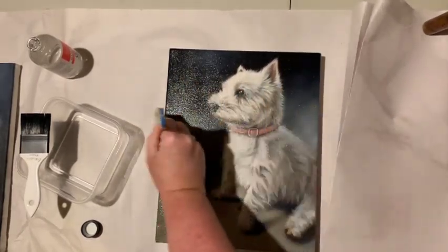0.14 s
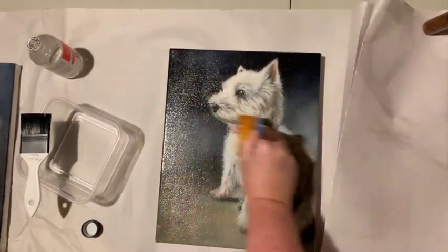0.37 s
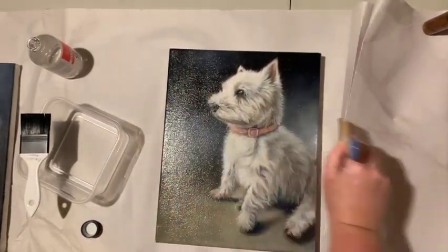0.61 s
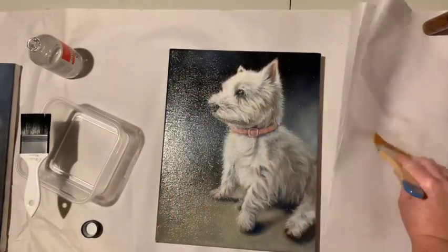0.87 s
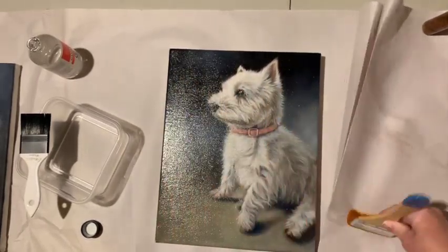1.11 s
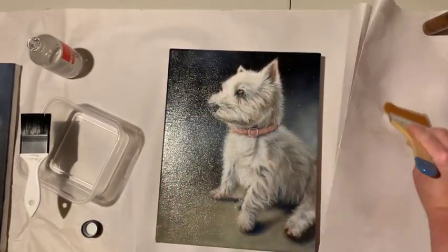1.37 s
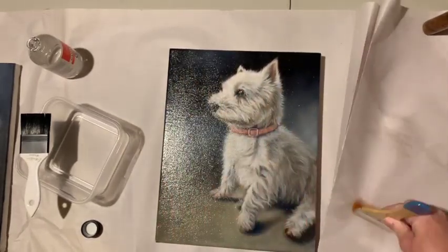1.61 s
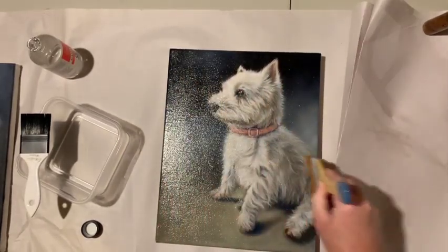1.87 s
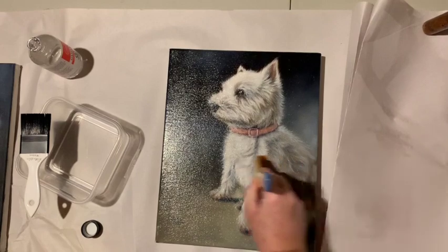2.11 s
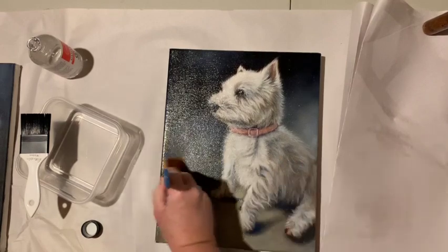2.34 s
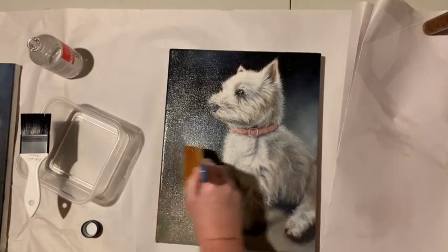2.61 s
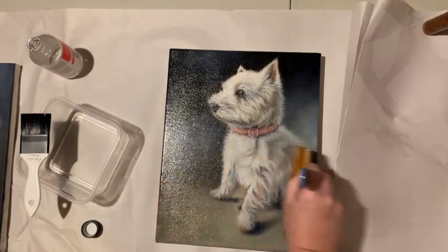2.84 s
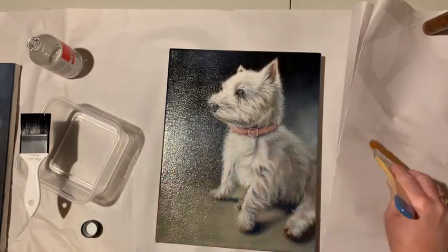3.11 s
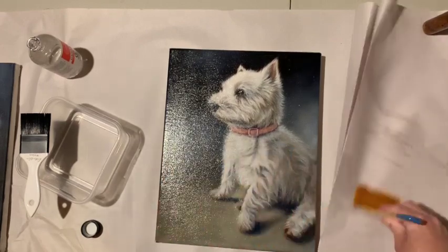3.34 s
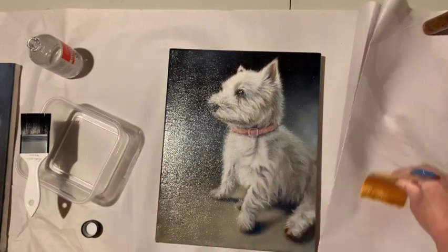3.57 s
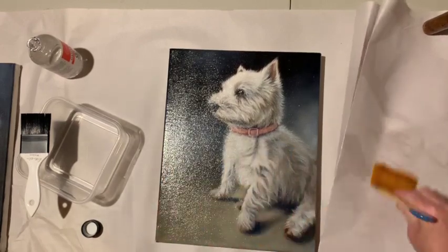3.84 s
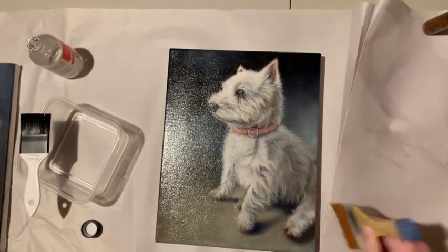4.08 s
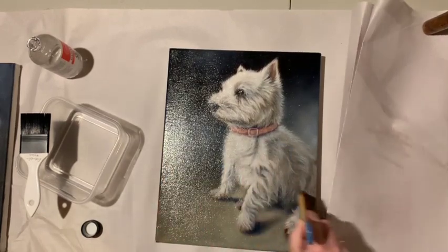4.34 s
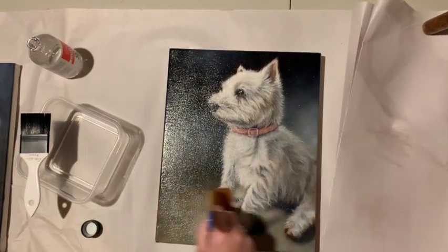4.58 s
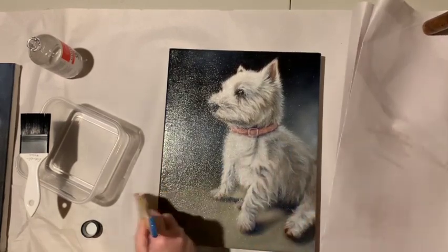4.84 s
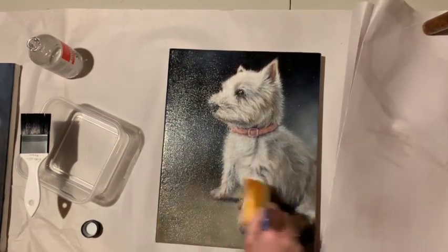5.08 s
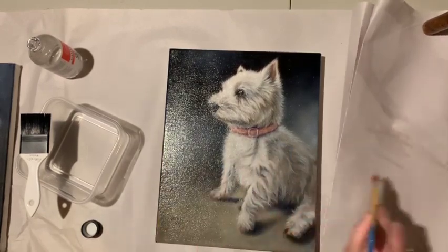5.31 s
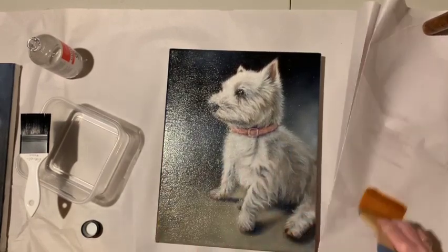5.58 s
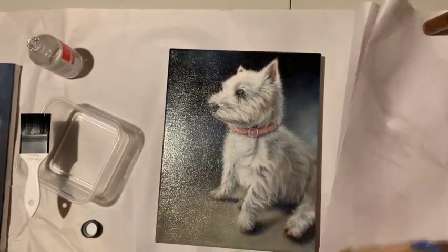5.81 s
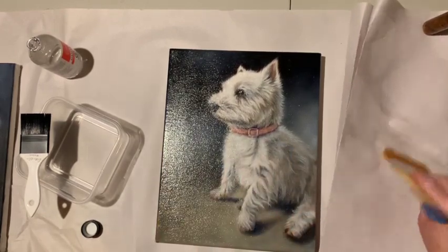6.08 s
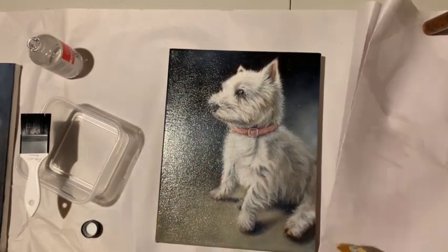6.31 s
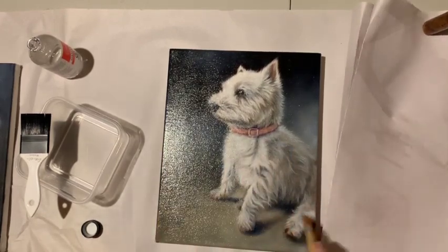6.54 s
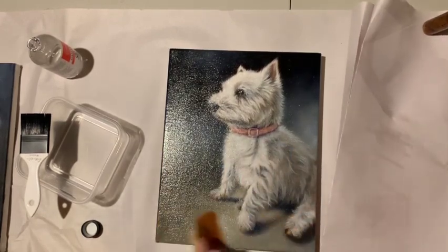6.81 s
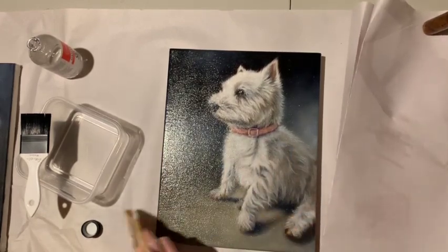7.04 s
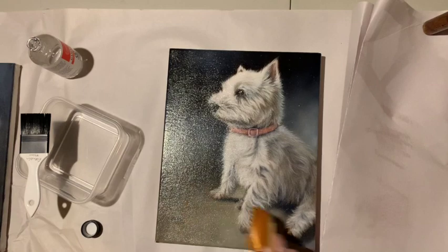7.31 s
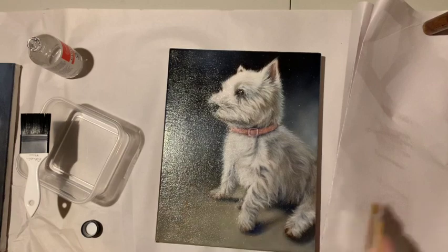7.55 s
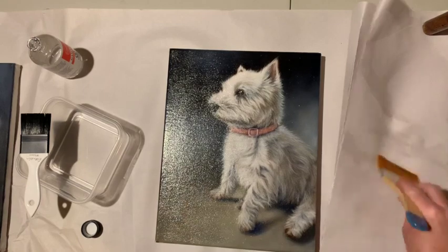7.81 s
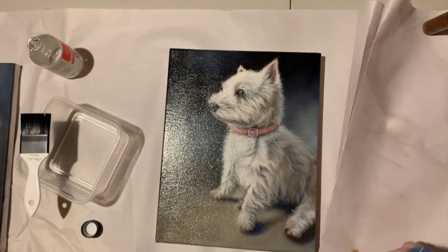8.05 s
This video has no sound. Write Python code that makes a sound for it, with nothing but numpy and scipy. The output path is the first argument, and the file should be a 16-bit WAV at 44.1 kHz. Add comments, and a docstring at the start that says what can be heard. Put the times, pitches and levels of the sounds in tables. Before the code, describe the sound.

Close up in a small quiet room, a flat bristle brush makes airy back-and-forth swishes over a varnished board. Between them it slaps onto loose paper, with a crisp tick and dull low boom, then scrapes to and fro with crackle and snaps. The pattern repeats about every two seconds; later board strokes grow louder. Faint rumble and a thin hum lie beneath.

```python
"""A flat brush is swept over a varnished board, then flopped onto loose paper and wiped to and fro.
Its bristles hiss and scratch: streams of random clicks, coloured and made louder and softer by each stroke.
The board answers through broad resonances; the paper crackles, rasps and snaps, and booms as low ringing tones.
A quiet room adds a short wash, dull rumble, faint hiss and a thin wavering hum."""
import sys
import numpy as np
from scipy import signal
from scipy.fft import rfft, irfft
from scipy.io import wavfile
from scipy.ndimage import uniform_filter1d

SR = 44100
rng = np.random.default_rng(int(sys.argv[2]) if len(sys.argv) > 2 else 0)


def file_out(sig):
    """Save sig as 16-bit WAV at sys.argv[1]."""
    # one column per channel
    cols = np.atleast_2d(sig).T
    # limit, then scale
    lim = np.clip(cols, -1, 1)
    pcm = np.round(lim * 32767).astype(np.int16)
    wavfile.write(sys.argv[1], SR, pcm)


def rack_gain(trim_db):
    """Turn a fader trim in dB into the linear factor to multiply a signal by."""
    fader = np.asarray(trim_db, float)
    return 10 ** (fader / 20)


N = 360297   # length in samples

# The quiet room's rumble. Each row: frequency in Hz, level in dB per Hz.
ROOM_COLOUR = [(25, -16), (104, 0), (155, -3), (250, -5.5), (355, -0.5), (421, -11), (543, -15.5),
               (631, -12), (800, -21.5), (1500, -22.5), (3000, -36.5), (4000, -29.5)]
ROOM_DB, ROOM_HISS_DB = -59.5, -95

# Thin steady tones. Each row: frequency in Hz, usual left level in dB rms, right over left in dB.
HUM_TONES = [(619.4, -65.5, -17)]

# Sweeps across the board. Each row: touch, fastest moment and lift in seconds, hiss in dB while creeping,
# hiss in dB at full speed, board in dB at full speed.
SWEEPS_ON_BOARD = [(0.146, 0.378, .55, -78.5, -55.5, -54), (1.964, 2.266, 2.415, -70, -61, -56.5),
                   (2.51, 2.714, 2.83, -73, -54.5, -54), (4.29, 4.594, 4.75, -69.5, -52.5, -54),
                   (4.89, 5.07, 5.20, -64.5, -50.5, -53.5), (6.538, 6.845, 6.99, -59.5, -42, -49),
                   (7.111, 7.30, 7.4, -56, -48.5, -56.5)]
SPEED_UP_DB_PER_S, SLOW_DOWN_DB_PER_S, ROUNDING_S = 161, 106, 0.047
BOARD_FOLLOWS, BOARD_LEADS_S = 0.82, 0.017   # the board takes this share of the swing, a little early
SCRATCH_AT_HISS_55_DB, SCRATCH_FOLLOWS = -57, 0.68   # scratch when the hiss is at -55 dB, share of its swing

# Wipes on the loose paper. Each row: touch and lift in seconds, levels of hiss, scratch and paper in dB.
WIPES_ON_PAPER = [(0.858, 1.35, -50.5, -53, -50), (1.424, 1.635, -50.5, -56.5, -53),
                  (3.155, 3.68, -53.5, -64, -66), (3.76, 3.967, -50.5, -56.5, -54),
                  (5.473, 6.045, -50, -50.5, -50), (6.097, 6.31, -50.5, -54, -53),
                  (7.799, 8.2, -51.5, -55, -53)]
PAPER_SETTLES_S = 0.15   # the paper still counts as the surface this long after a lift

# How contact begins and ends, in the order hiss, scratch, surface.
TOUCH_DB_PER_S, LIFT_DB_PER_S = (2000, 1500, 1200), (465, 295, 222)
# A faint creep lingers after a lift; paper keeps moving more than the board.
BOARD_SETTLE_DB, PAPER_SETTLE_DB, SETTLE_DB_PER_S = (-27, -23, -7), (-30, -17, -7), (28, 60, 67)

# Bristles splay as the brush comes down hard.
# Each row: time in seconds, fade in dB per second, levels of hiss, scratch and surface in dB.
BRUSH_LANDINGS = [(.866, 228, -52, -40, -43), (1.64, 337, -71, -41, -41), (1.955, 105, -76, -54.5, -48.5),
                  (2.514, 50, -73, -61.5, -64), (3.163, 152, -42.5, -38.5, -58),
                  (4.297, 87, -69, -56, -57.5), (5.469, 153, -50, -57, -53),
                  (5.938, 194, -35.5, -42, -39.5), (6.53, 161, -71, -55, -54),
                  (6.698, 300, -45.5, -39.5, -46), (7.802, 202, -46.5, -47, -47.5)]
LANDING_DB_PER_S = 2501   # how fast a landing swells

# Short rustles and flicks that swell and fade.
# Each row: time in seconds, fade in dB per second, levels of hiss, scratch and surface in dB.
SHORT_RUSTLES = [(0.048, 400, -60.5, -60, -59), (1.083, 300, -49, -37.5, -42.5),
                 (1.185, 200, -43, -43, -43.5), (1.342, 202, -76, -55, -47.5),
                 (1.444, 203, -51, -46.5, -43), (1.841, 600, -90, -75, -55.5),
                 (3.387, 53, -46.5, -47.5, -46.5), (3.52, 152, -52, -57, -58), (3.682, 411, -55, -55, -45),
                 (4.78, 400, -52.5, -56, -62), (8.15, 200, -47, -45, -50.5), (5.698, 203, -46, -54, -52.5),
                 (6.034, 253, -56, -41, -50), (6.553, 260, -53, -57, -74), (7.313, 200, -60, -45, -46),
                 (7.444, 303, -67, -59, -62), (7.573, 300, -95, -78, -61), (3.65, 217, -48.5, -62, -68),
                 (6.106, 206, -46, -52, -49), (7.997, 153, -47, -46.5, -48.5)]
RUSTLE_SWELL = 2.64   # the swell is this many times faster than the fade

# The sheet is pressed flat just after a landing.
# Each row: time in seconds, fade in dB per second, levels of hiss, scratch and paper in dB.
SHEET_SLAPS = [(0.893, 247, -59, -47, -38.5), (3.18, 150, -43.5, -34, -35.5), (5.494, 134, -65, -54, -45),
               (7.824, 258, -61, -44, -41.5)]
SLAP_DB_PER_S = 1100   # how fast a slap swells
RASP_HZ, RASP_WIDTH_HZ, RASP_OVER_PAPER_DB = 1400, 1200, 1

# Colour of the bristle hiss. Each row: frequency in Hz, level in dB per Hz.
HISS_COLOUR = [(3000, -16), (4500, -3), (5500, 0), (7000, -1), (10000, -1), (12000, -3), (16000, -4)]
# Colour of the bristle scratch. Each row: frequency in Hz, level in dB per Hz.
SCRATCH_COLOUR = [(1500, -10), (2200, -1), (3000, 0), (4000, -1), (4800, -6), (6000, -22)]
# Colour of the paper's crackle. Each row: frequency in Hz, level in dB per Hz.
PAPER_COLOUR = [(50, -11.5), (110, -0.5), (220, -9), (330, -3), (480, -9.5), (800, -5.5), (1100, -6.5),
                (1600, -5.5), (2200, -8), (3200, -21.5)]
# Broad resonances of the board. Each row: frequency in Hz, width in Hz, level in dB before speed shifts it.
BOARD_MODES = [(676, 315, 2.5), (1030, 410, -4), (1292, 480, -5), (1830, 2000, -14)]

# Ticks of the brush against an edge and snaps of paper.
# Each row: time in seconds, peak of the high part in dB, peak of the low part over it in dB.
TICK_TIMES = [(.1411, -60, -6), (0.8687, -27, -5), (0.9292, -27, -6), (1, -35, -1.5), (1.081, -25.5, -5),
              (1.108, -39, 8.5), (1.1977, -39, 7), (1.2526, -36, 8), (1.317, -36, -12),
              (1.5223, -39.5, 7.5), (1.6357, -34, -11), (1.8203, -65.5, 22.5), (2.5107, -57.5, 13),
              (3.1621, -23.5, 0.5), (3.3922, -27.5, -6), (3.6768, -33.5, -6.5), (3.756, -36, -23),
              (3.8366, -40, 10.5), (3.951, -45, 7), (4.2918, -45, -3), (4.7766, -38, -9), (4.8925, -45, -5),
              (5.464, -34.5, -6), (5.756, -26.5, 3.5), (5.9022, -26.5, -10.5), (5.911, -27, 1),
              (5.934, -9, -14.5), (6.021, -28, 1), (6.1782, -44, 7), (6.2994, -39, 7), (6.5256, -43, -1),
              (6.702, -19, -28), (6.887, -31.5, 0), (7.1117, -53, -14), (7.306, -28.5, -14),
              (7.379, -39, 0), (7.5658, -66, 15), (8.078, -41, 5.5)]
# Resonances of a tick, the low part first. Each row: frequency in Hz, width in Hz, usual level in dB.
TICK_RESONANCES = [(1480, 1800, 0), (3630, 2700, 3), (5260, 1900, 2.5), (6610, 3700, -0.5),
                   (9600, 3600, -7.5)]

# The sheet is slapped onto the table. Each row: time in seconds, strength in dB.
BOOM_TIMES = [(0.891, -31.5), (1.473, -46.5), (3.191, -29.5), (3.78, -51), (3.928, -48), (5.501, -37.5),
              (5.962, -50), (6.706, -50.5), (7.829, -38.5)]
# Low modes of sheet and table.
# Each row: frequency in Hz, usual level in dB, time in seconds to fade by 60 dB.
SHEET_MODES = [(71, -14.5, .3), (103, -6.5, 0.35), (150.5, 0.5, 0.52), (171.5, -7, 0.35), (286, -17, 0.16)]
FREE_RING_S, DAMPED_DB = 0.081, -4.5   # after ringing freely, the sheet is damped by the dragging brush

TAIL_T60_S, TAIL_DB = 0.1, -10   # time for the walls' wash to fade by 60 dB, and its level

# Phase of the stereo widening. Each row: frequency in Hz, radians by which the right leads.
WIDENING_PHASE = [(0, 0), (700, .6), (1500, .1), (2500, -2.2), (3100, -1.35), (3700, -1.75), (4700, -3.14),
                  (15350, -18.85)]
# Wavering copy of the sound added on the right, blurring the stereo image.
# Each row: frequency in Hz, level in dB over the steady copy.
RIGHT_WAVER = [(60, -17), (150, -7.5), (500, 3.5), (1600, -2.5), (2500, 4), (4500, -12.5)]
# Balance of the two sides. Each row: frequency in Hz, right over left in dB.
RIGHT_BALANCE = [(100, 0), (400, -2), (1000, 0.5), (2300, 1.5), (3200, 0.5)]
CUTOFF_HZ = 15720


def rms_one(x):
    """Scale a sound so that its average strength (rms) is 1."""
    return x / np.sqrt(np.mean(x ** 2) + 1e-20)


def at_hz(points, hz):
    """Read a curve at any frequency, joining its points on a logarithmic frequency scale."""
    hz_points, values = np.transpose(points)
    return np.interp(np.log(hz + 1), np.log(hz_points), values)


def coloured(x, spectrum, edge_db=-40):
    """Shape by a spectrum that falls away beyond its ends; rms 1."""
    lowest_hz, highest_hz = spectrum[0][0], spectrum[-1][0]
    closed = [(lowest_hz / 2, edge_db), *spectrum, (highest_hz * 2, edge_db)]
    gain = rack_gain(at_hz(closed, np.fft.rfftfreq(N, 1 / SR)))
    return rms_one(irfft(rfft(x) * gain, N))


def drift(rate):
    """Slow random wandering of rms 1, made by smoothing noise; a higher rate in Hz wanders faster."""
    r = np.exp(-2 * np.pi * rate / SR)
    noise = rng.standard_normal(N + SR)
    smooth = signal.lfilter([1], [1, -2 * r, r * r], noise)
    return rms_one(smooth[SR:])   # leave out the first second, while the filter settles


def grains(per_s, spread_db):
    """Random clicks, up or down, with a long tail of sizes."""
    signs = rng.choice([-1, 1], N)
    sizes = rack_gain(spread_db * np.minimum(rng.exponential(1, N), 5))
    return sizes * signs * (rng.random(N) < per_s / SR)


def band(x, hz, width_hz):
    """One resonance, gain 1 on top."""
    r = np.exp(-np.pi * width_hz / SR)
    feedback = [1, -2 * r * np.cos(2 * np.pi * hz / SR), r * r]
    return signal.lfilter([(1 - r * r) / 2, 0, (r * r - 1) / 2], feedback, x + 1e-18)


def room():
    """Dull steady rumble and faint hiss: coloured noise plus plain noise."""
    rumble = coloured(rng.standard_normal(N), ROOM_COLOUR)
    return rack_gain(ROOM_DB) * rumble + rack_gain(ROOM_HISS_DB) * rng.standard_normal(N)


def hum():
    """A thin tone whose phase and level waver a little, stronger on the left."""
    now, out = np.arange(N) / SR, np.zeros((2, N))
    for hz, left_db, right_db in HUM_TONES:
        tone = np.sqrt(2) * np.sin(2 * np.pi * hz * now + 1.2 * drift(4))
        out += tone * rack_gain(1.5 * drift(3) + [[left_db], [left_db + right_db]])
    return out


def hump(now, s, rise, fall):
    """dB that climb to 0 at s and sink again."""
    return np.where(now < s, rise * (now - s), fall * (s - now))


def swing(now, fastest, depth_db):
    """dB below full speed: a rounded top, never under the creeping level."""
    away = np.hypot(now - fastest, ROUNDING_S) - ROUNDING_S
    slope = np.where(now < fastest, SPEED_UP_DB_PER_S, SLOW_DOWN_DB_PER_S)
    return np.maximum(depth_db, -away * slope)


def contact(now, touch, lift, settle_db):
    """dB gate for hiss, scratch and surface: quick touch, slower lift, then a faint settling."""
    early, late = np.maximum(touch - now, 0), np.maximum(now - lift, 0)
    gates = []
    for up, down, rest, creep in zip(TOUCH_DB_PER_S, LIFT_DB_PER_S, settle_db, SETTLE_DB_PER_S):
        ending = np.maximum(-down * late, rest - creep * late)
        gates.append(-up * early + ending)
    return np.array(gates)


def stroke_levels():
    """Levels of hiss, scratch and surface in dB: the powers of all gestures add up."""
    now, parts = np.arange(N // 32 + 2) * 32 / SR, []   # one point every 32 samples
    for touch, fastest, lift, creep_db, top_db, board_db in SWEEPS_ON_BOARD:
        held = np.minimum(now, lift)   # the speed is held from the lift onwards
        depth_db = creep_db - top_db
        hiss_db = top_db + swing(held, fastest, depth_db)
        scratch_db = SCRATCH_AT_HISS_55_DB + SCRATCH_FOLLOWS * (hiss_db + 55)
        body_db = board_db + BOARD_FOLLOWS * swing(held, fastest - BOARD_LEADS_S, depth_db)
        gate = contact(now, touch, lift, BOARD_SETTLE_DB)
        parts.append(np.array([hiss_db, scratch_db, body_db]) + gate)
    for touch, lift, *levels in WIPES_ON_PAPER:
        parts.append(np.c_[levels] + contact(now, touch, lift, PAPER_SETTLE_DB))
    for s, fade, *levels in SHEET_SLAPS:
        parts.append(np.c_[levels] + hump(now, s, SLAP_DB_PER_S, fade))
    for s, fade, *levels in BRUSH_LANDINGS:
        parts.append(np.c_[levels] + hump(now, s, LANDING_DB_PER_S, fade))
    for s, fade, *levels in SHORT_RUSTLES:
        parts.append(np.c_[levels] + hump(now, s, RUSTLE_SWELL * fade, fade))
    power = sum(rack_gain(2 * np.maximum(part, -150)) for part in parts)
    return [np.interp(np.arange(N) / SR, now, db) for db in 10 * np.log10(power)]


def bristle_hiss(hiss_db):
    """Thousands of tiny bristle slips a second blend into a bright hiss."""
    slips = grains(14000, spread_db=-1.0)
    return coloured(slips, HISS_COLOUR) * rack_gain(hiss_db + 0.96 * drift(30))


def bristle_scratch(scratch_db, loose, buckling):
    """Bristles catch and let go; on loose paper the catches are fewer, harder and clumped."""
    catches = grains(6000 - 3500 * loose, spread_db=0.5 + 0.6 * loose)
    level_db = scratch_db + 0.52 * drift(25) + 0.79 * loose * buckling
    return coloured(catches, SCRATCH_COLOUR) * rack_gain(level_db)


def brush():
    """Bristles hiss and scratch; the surface under them answers with its own colour."""
    now = np.arange(N) / SR
    hiss_db, scratch_db, surface_db = stroke_levels()
    wiping = [(now > touch) & (now < lift + PAPER_SETTLES_S) for touch, lift, *_ in WIPES_ON_PAPER]
    on_paper = np.any(wiping, axis=0)
    loose = uniform_filter1d(on_paper * 1., size=400)   # 0 on the board, 1 on paper, with soft changes
    buckling = drift(25)   # loose paper gives way in fits
    surface = (1 - loose) * board(hiss_db) + loose * paper_crackle(buckling)
    bristles = bristle_hiss(hiss_db) + bristle_scratch(scratch_db, loose, buckling)
    return bristles + rack_gain(surface_db) * surface


def ticks(burst_s=0.0024):
    """Each tick is a burst of a few milliseconds through broad resonances of uneven strength."""
    out, age = np.zeros(N), np.arange(800) / SR
    for s, peak_db, low_db in TICK_TIMES:
        burst = rng.standard_normal(len(age)) * np.exp(-age / burst_s)
        parts = []
        for hz, width, db in TICK_RESONANCES:
            ring = band(band(burst, hz, width), hz, width)
            parts.append(ring * rack_gain(db + 2.2 * rng.standard_normal()))
        low, high = parts[0], sum(parts[1:])
        sound = high / np.abs(high).max() + rack_gain(low_db) * low / np.abs(low).max()
        at = round(s * SR)
        out[at:at + len(age)] += rack_gain(peak_db) * sound[:N - at]
    return out


def board(hiss_db):
    """Bristle slips shake broad modes of the board; a faster stroke feeds the higher ones."""
    slips = grains(5000, spread_db=2.0)
    speed = np.clip((hiss_db + 62.5) / 10, -1, 1)   # judged by the hiss: -1 slow, 1 fast
    out = np.zeros(N)
    for k, (hz, width, db) in enumerate(BOARD_MODES):
        tilt_db = 3.5 * speed * np.log2(hz / 900)
        mode = band(band(slips, hz, width), hz, width) * rack_gain(db + tilt_db + 1.1 * drift(12))
        out += mode * (-1) ** k   # neighbouring modes have opposite signs
    return rms_one(out)


def paper_crackle(buckling):
    """Loose paper gives way in fits, so its crackle comes in clumps."""
    crackles = grains(3000 * rack_gain(3.0 * buckling), spread_db=2.5)
    return coloured(crackles, PAPER_COLOUR)


def booms(push_s=.007):
    """A soft push sets the low modes of sheet and table ringing."""
    out, age = np.zeros(N), np.arange(SR // 2) / SR
    onset = 1 - np.exp(-age / push_s)
    damping = rack_gain(DAMPED_DB * np.clip((age - FREE_RING_S) / push_s, 0, 1))
    for s, strength_db in BOOM_TIMES:
        ring = np.zeros(len(age))
        for hz, db, t60 in SHEET_MODES:
            level_db = db + rng.normal(0, 1.5)   # every boom has its own balance of modes
            ring += rack_gain(level_db - 60 * age / t60) * np.sin(2 * np.pi * hz * age)
        at = round(s * SR)
        out[at:at + len(age)] += (rack_gain(strength_db) * ring * onset * damping)[:N - at]
    return out


def slap_rasp():
    """Bristles rasp through the flattening sheet: dense clicks in one mid-pitched band."""
    now, swell = np.arange(N) / SR, np.zeros(N)
    for s, fade, *_, paper_db in SHEET_SLAPS:
        swell += rack_gain(paper_db + RASP_OVER_PAPER_DB + hump(now, s, SLAP_DB_PER_S, fade))
    clicks = grains(5000, spread_db=2.0)
    rasp = band(band(clicks, RASP_HZ, RASP_WIDTH_HZ), RASP_HZ, RASP_WIDTH_HZ)
    return swell * rms_one(rasp)


def tail(x):
    """Walls return a short dying wash, made by smearing the sound with fading noise."""
    age = np.arange(SR // 3) / SR
    fade = rack_gain(-60 * age / TAIL_T60_S) * (age > .003)   # nothing returns in the first 3 ms
    wash = rng.standard_normal(len(age)) * fade
    return rack_gain(TAIL_DB) * signal.fftconvolve(x, wash / np.sqrt(np.sum(wash ** 2)))[:N]


def widen(x):
    """Stereo widening: the right is the left with its phase turned, plus a copy whose phase wavers."""
    hz = np.fft.rfftfreq(N, 1 / SR)
    turn = np.exp(1j * np.interp(hz, *np.transpose(WIDENING_PHASE)))
    waver_gain = rack_gain(at_hz(RIGHT_WAVER, hz))
    wavering = (signal.hilbert(x) * np.exp(3j * drift(4.81))).real
    both = rfft(x) * turn + rfft(wavering) * waver_gain
    balance = rack_gain(at_hz(RIGHT_BALANCE, hz)) / np.sqrt(1 + waver_gain ** 2)   # the added copy keeps the level
    return np.array([x, irfft(both * balance, N)])


def scene():
    """Brush, paper and room are widened to stereo, then the hum is added to both sides."""
    near = brush() + ticks() + slap_rasp()
    return widen(near + tail(near) + booms() + room()) + hum()


def top_cut(x):
    """Nothing passes above the cut-off."""
    return signal.sosfilt(signal.butter(12, 16830, fs=SR, output="sos"), x)


def record(dry):
    """The top of the treble is cut steeply by a low-pass filter."""
    low_pass = signal.ellip(10, .5, 40, CUTOFF_HZ, fs=SR, output="sos")
    mix = signal.sosfilt(low_pass, dry)
    return top_cut(mix)


dry = scene()
out = record(dry)
file_out(out)
```